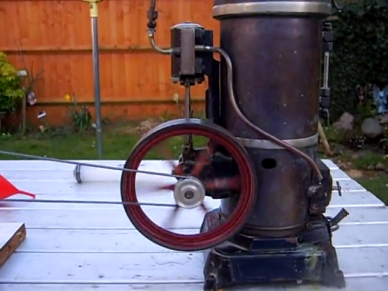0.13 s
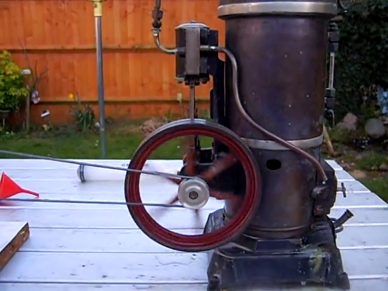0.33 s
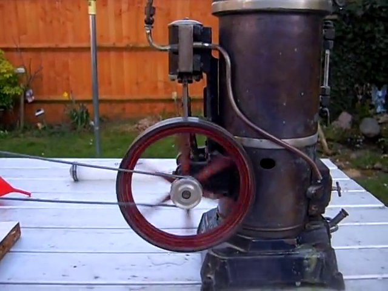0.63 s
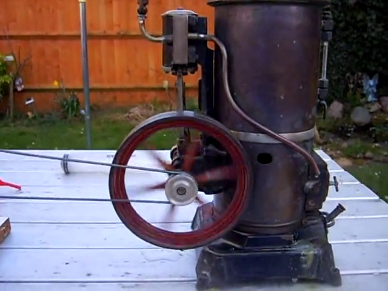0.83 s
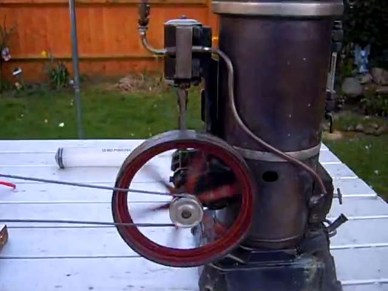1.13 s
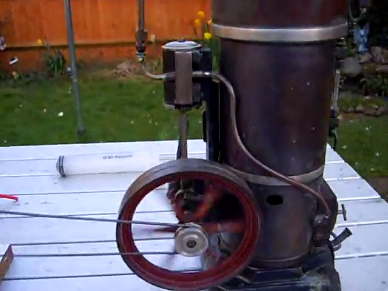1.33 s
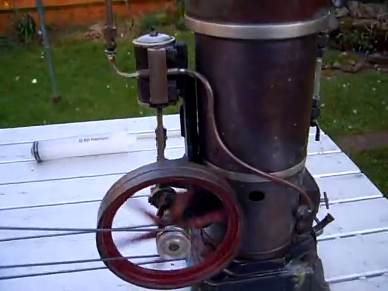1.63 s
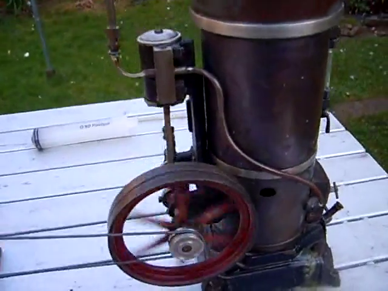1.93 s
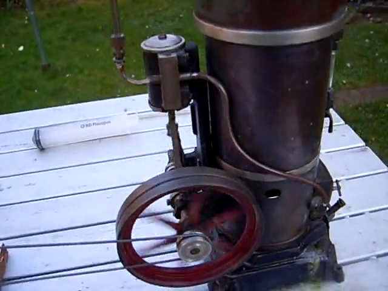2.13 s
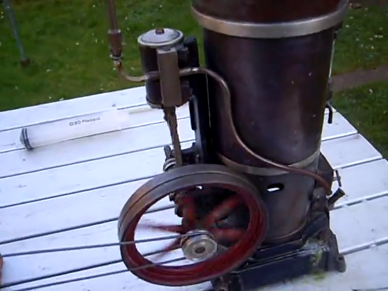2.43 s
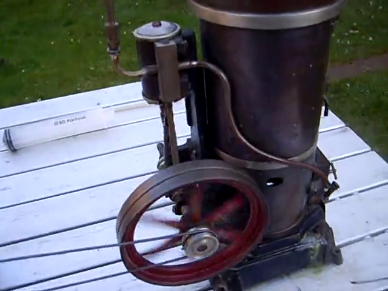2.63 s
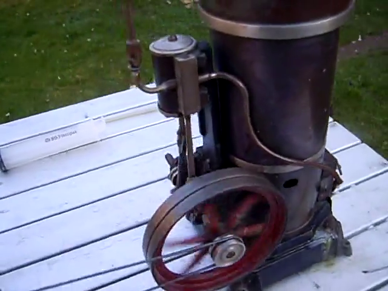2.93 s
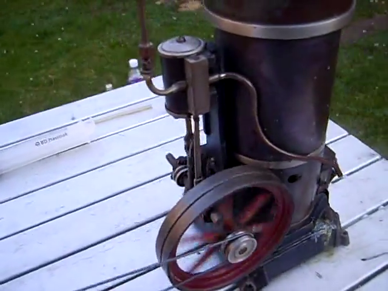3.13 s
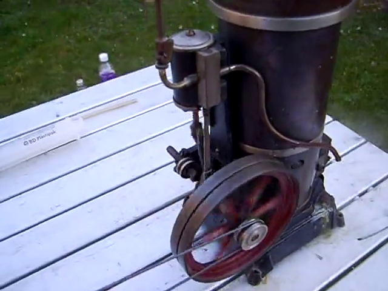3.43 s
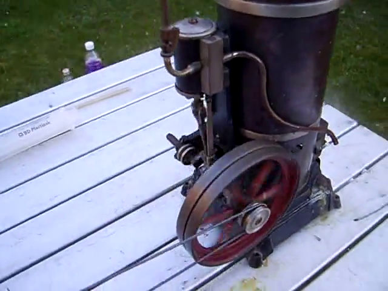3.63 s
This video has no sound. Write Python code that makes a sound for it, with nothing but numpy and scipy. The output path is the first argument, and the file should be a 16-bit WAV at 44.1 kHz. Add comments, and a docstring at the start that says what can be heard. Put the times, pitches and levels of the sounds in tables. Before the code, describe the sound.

A small model steam engine runs steadily outdoors, close to the microphone, hissing about twenty-one puffs a second, with a wet chirp each turn, sharp spits, a low buzz and a double belt knock roughly every 0.6 seconds.

```python
"""Hissing puffs come first, two to each turn of a small model steam engine, heard close by as the listener rises.
The puffs are coloured noise let through by opening and closing ports, with tiny ticks of spray inside them.
Behind them lie a low buzz built from sine waves and the soft noise of the garden air and running gear.
Noise bands make the rubbing slides; short falling tones make a chirp in each turn; drops splash and ring.
The belt joint knocks with fading tones and a noisy rattle, and a thin sine whine comes up late."""
import sys
import numpy as np
from scipy.fft import rfft, irfft, next_fast_len
from scipy.io import wavfile
from scipy.ndimage import uniform_filter1d, map_coordinates

SR = 44100
rng = np.random.default_rng(int(sys.argv[2]) if len(sys.argv) > 2 else 0)


def wrap_up_sound(samples):
    """Save the sound to the file named by the first command line argument, as 16-bit audio."""
    columns = np.atleast_2d(samples).T
    # keep every value between -1 and 1, then stretch to whole-number steps
    tamed = np.clip(columns, -1, 1)
    steps = np.round(tamed * 32767).astype(np.int16)
    wavfile.write(sys.argv[1], SR, steps)


N = 166257  # length in samples


def amp(db):
    """Turn decibels into a multiplier for the sound."""
    return 10 ** (np.asarray(db) / 20)


def unit(x):
    """Scale a sound so that its rms (average strength) is 1."""
    return x / np.sqrt(np.mean(x ** 2) + 1e-20)


def curve(rows, column=1):
    """Draw straight lines between the timed points of one column, giving a value at every sample."""
    columns = np.transpose(rows)
    return np.interp(np.arange(N) / SR, columns[0], columns[column])


def along(points, hz):
    """Read values between (pitch, value) points, spacing the pitches as the ear does (log scale)."""
    point_hz, values = np.transpose(points)
    return np.interp(np.log(hz + 1), np.log(point_hz), values)


def wobble(rate):
    """Join random values, rate of them a second, into a smooth curve."""
    knots = rng.standard_normal(int(N * rate / SR) + 4)
    return map_coordinates(knots, [np.arange(N) * rate / SR])


def filtered(x, response):
    """Make each frequency of a sound stronger or weaker, as response says."""
    size = next_fast_len(N + SR // 2)  # spare room keeps the end from wrapping onto the start
    gains = response(np.fft.rfftfreq(size, 1 / SR))
    return irfft(rfft(x, size) * gains, size)[:N]


def noise(spectrum):
    """Colour random noise by a (pitch_hz, level_db) table, thin out its deepest bass and set rms to 1."""
    def colour(hz):
        """Table level times a gentle bass cut."""
        bass_cut = hz / (hz + spectrum[0][0] / 2)
        return amp(along(spectrum, hz)) * bass_cut
    return unit(filtered(rng.standard_normal(N), colour))


def phase_of(hz):
    """Add up a changing pitch into the running angle of its wave, in radians."""
    return 2 * np.pi * np.cumsum(hz) / SR


def add(track, s, sound):
    """Mix a short sound into a track at s seconds, cutting it off at the track's end."""
    part = track[max(round(s * SR), 0):][:len(sound)]
    part += sound[:len(part)]


def steam(view):
    """Rushing steam is noise whose colour blends with the listener's position, plus one sliding band."""
    # colour of the steam from each position: pitch_hz, level_db
    side = [(400, -13.5), (900, -13), (1400, -10), (1850, -9.5), (2450, -23), (3050, -2), (3650, 3),
            (4200, 0), (4750, -14.5), (5350, -7), (5800, -14), (6450, -4.5), (7150, -8), (7600, -14.5),
            (8200, -21.5)]
    half_above = [(400, -15), (1500, -11), (2050, -5), (2400, -3.5), (3100, 5), (3650, -4), (4550, -5.5),
                  (5200, -1.5), (5850, -10), (6600, -1), (7200, 1), (7600, 3.5), (8200, -26)]
    above = [(400, -8.5), (1500, -13), (2080, -7.5), (2400, -10), (2950, -1), (3620, -12), (4150, -3.5),
             (4650, -7.5), (5300, -5), (5850, -10), (6450, 2.5), (7450, 4), (8200, -21)]
    # band of hiss that slides down as the listener rises: start_s, pitch_hz, level_db
    glide = [(0, 6570, -11.5), (.8, 6550, -7.5), (1.15, 6320, -5), (1.45, 5850, -10.5), (1.75, 5300, -7),
             (2.3, 5063, -12), (3.77, 5050, -13.5)]
    glide_width_hz = 740

    hiss = np.zeros(N)
    for position, colour in enumerate((side, half_above, above)):
        share = np.clip(1 - abs(view - position), 0, 1)
        hiss += np.sqrt(share) * noise(colour)

    def slow_noise():
        """Noise near zero pitch, ready to be moved up to the band."""
        return unit(filtered(rng.standard_normal(N), lambda hz: np.exp(-2 * (hz / glide_width_hz) ** 2)))

    phase = phase_of(curve(glide))
    band = slow_noise() * np.cos(phase) + slow_noise() * np.sin(phase)
    return hiss + amp(curve(glide, column=2)) * band


def valve(turns, opens, closes, rise, fall, sag_db):
    """A port opens and closes once a turn, and its flow sags steadily while open."""
    since_opening = (turns - opens + rise / 2) % 1  # in turns
    opening = np.clip(since_opening / rise, 0, 1)
    closing = np.clip((closes - opens - since_opening) / fall, 0, 1)
    return opening * closing * amp(-sag_db * since_opening)


def spray():
    """Tiny drops tick at random moments, each a brief fading tone."""
    drops_per_s, loudest_db, t60_s = 8.8, -35.5, .005  # t60_s: time to fade by 60 dB
    out, t = np.zeros(N), np.arange(SR // 100) / SR
    for when, size, pitch in rng.random((int(drops_per_s * N / SR), 3)):
        fade = amp(loudest_db - 5 * size - 60 * t / t60_s)
        tone = np.sin(2 * np.pi * (3000 + 4000 * pitch) * t)
        add(out, when * N / SR, fade * tone)
    return out


def exhaust(turns):
    """Two ports let out a strong and a duller weak puff each turn, with a little leakage between."""
    # ports: opens_turn (middle of the rise), closes_turn (shut half a rise before this),
    # rise_turns, fall_turns, sag_db per turn
    strong_puff = (0.0016, 0.44, 0.029, 0.071, 3)
    weak_puff = (0.5, 0.87, 0.02, 0.03, 10.4)
    # level of each puff: start_s, level_db
    strong_db = [(0, -43.5), (.7, -45), (1.2, -44), (1.6, -45), (2.2, -44.5), (2.9, -43), (3.3, -42.5),
                 (3.77, -44)]
    weak_db = [(0, -44), (.7, -44), (1.2, -44), (1.6, -47.5), (2.2, -45), (2.9, -43.5), (3.77, -45)]
    # duller colour of the weak puff: pitch_hz, level_db
    weak_tilt = [(600, 3.5), (3000, 0.5), (5000, -2), (7500, -4)]
    # where the listener is: start_s, position (0 side, 1 half above, 2 above)
    view_points = [(0, 0.11), (1.2, 0), (1.85, 1.32), (2.3, 1.63), (2.9, 2), (3.77, 1.88)]
    leak_db = -19.5  # next to the strong puff
    flutter_db, scatter_db = 1.58, 0.68  # scale of fast roughness and of slower wandering

    view = curve(view_points)
    strong_gate = valve(turns, *strong_puff)
    weak_gate = valve(turns, *weak_puff)
    strong = amp(curve(strong_db)) * np.hypot(strong_gate, amp(leak_db)) * steam(view)
    dull_steam = filtered(steam(view), lambda hz: amp(along(weak_tilt, hz)))
    weak = amp(curve(weak_db)) * weak_gate * dull_steam
    roughness = amp(flutter_db * wobble(450) + scatter_db * wobble(20))
    return (strong + weak) * roughness + spray() * (strong_gate + weak_gate)


def drone():
    """A low motor-like buzz adds sine waves at multiples of its pitch; its pattern repeats every four beats."""
    # main pitch before a slight wobble: start_s, pitch_hz
    pitch_points = [(0, 65.2), (1, 65), (2, 64.7), (3, 64.4), (3.77, 64.3)]
    # level of the upper and in-between waves together: start_s, level_db
    upper_db = [(0, -13), (.7, -10.5), (1.3, -5), (2, -3), (3, -1.5), (3.77, -2.5)]
    # sine waves (partials): multiple of the main pitch, level_db
    low = [(1, -68.5), (2, -72)]
    high = [(3, -61), (4, -56.5), (5, -70)]
    between = [(2.75, -71), (3.25, -64.5), (3.5, -63), (3.75, -68), (4.25, -70.5), (4.5, -63), (4.75, -60),
               (5.25, -64), (5.75, -69)]
    disorder_rad = .3  # random shift between partials

    phase = phase_of(curve(pitch_points) * (1 + 0.0011 * wobble(6.3)))

    def partials(rows, spread):
        """Add the waves, nearly in step or spread out over the pattern."""
        total = np.zeros(N)
        for multiple, db in rows:
            quarters = round(4 * multiple)  # counted in quarters of the main pitch
            shift = spread * np.pi * quarters * quarters / 13 + disorder_rad * rng.standard_normal()
            total += np.sqrt(2) * amp(db) * np.cos(quarters * phase / 4 + shift)
        return total

    upper = partials(high, False) + partials(between, True)
    return partials(low, False) + amp(curve(upper_db)) * upper


def air():
    """Garden air and running gear make a steady coloured noise whose level drifts."""
    # colour: pitch_hz, level_db
    colour = [(25, -7), (60, 2.5), (110, -1), (250, 2), (420, 2), (600, 2), (1000, 2), (1600, -7),
              (3000, -8), (8000, -23.5)]
    # overall level: start_s, level_db
    level = [(0, -56), (1.5, -57.5), (2.3, -54.5), (3.77, -57)]
    return amp(curve(level)) * noise(colour)


def slides(turns):
    """Rods and slides rub at the same places in every turn, each giving a swell of band noise."""
    # rubbing places: centre_turn, width_turns, pitch_hz, bandwidth_hz, level_db at the centre
    rubs = [(.27, 0.035, 2050, 670, -50), (0.356, 0.023, 2880, 583, -51.5), (.52, 0.029, 1026, 468, -53),
            (0.619, 0.055, 1170, 487, -59.5), (0.811, 0.016, 1944, 900, -62.5)]
    out = np.zeros(N)
    for centre, width, hz, band_hz, db in rubs:
        rub = unit(filtered(rng.standard_normal(N), lambda f: 1 / (1 + (2 * (f - hz) / band_hz) ** 2)))
        from_centre = (turns - centre + .5) % 1 - .5  # in turns
        out += amp(db) * rub * np.exp(-(from_centre / width) ** 2)
    return out


def chirps(turns):
    """A short wet tone falls in pitch as the strong puff shuts off, a little different each turn."""
    # level before scatter and colouring: start_s, level_db
    level = [(0, -40), (.7, -46.5), (1.25, -40), (1.6, -42), (2.5, -42), (3.77, -42.5)]
    # starting pitch: start_s, multiple of base_hz
    start_pitch = [(0, 1.38), (1.1, 1.2), (1.7, 0.978), (3.77, 0.87)]
    # colour: pitch_hz, level_db
    body = [(500, -9), (950, 3.5), (1180, -6), (1600, -1), (2000, -0.5), (2800, -4.5)]
    at_turn, base_hz, end_hz = .415, 2760, 684
    glide_s, length_s = 0.00198, 0.0073
    rough_rad, scatter_db = .55, 1.2

    out, t = np.zeros(N), np.arange(SR // 50) / SR
    times = np.interp(np.arange(int(turns[-1])) + at_turn, turns, np.arange(N) / SR)
    start_hz = base_hz * curve(start_pitch)
    shape = np.sin(np.pi * np.clip(t / length_s, 0, 1) ** 0.57)  # quick rise, slower fall
    for s, (size, tune, late) in zip(times, rng.standard_normal((len(times), 3))):
        pitch = end_hz + (start_hz[int(s * SR)] - end_hz) * np.exp(-t / glide_s)
        rough = rough_rad * unit(uniform_filter1d(rng.standard_normal(len(t)), size=24))
        tone = np.sin(phase_of(pitch * (1 + 0.057 * tune)) + rough)
        add(out, s + 0.00035 * late, amp(scatter_db * size) * shape * tone)
    return filtered(out * amp(curve(level)), lambda hz: amp(along(body, hz)))


def spits():
    """Each drop of water bursts with a noisy splash and rings the exhaust pipe briefly at two pitches."""
    # drops: start_s, level_db (shared by ring and splash), pitch_hz, t60_s (time to fade by 60 dB)
    drops = [(0.049, -24, 3700, 0.0056), (0.0987, -25.5, 3730, 0.013), (0.1447, -25, 3800, 0.011),
             (0.196, -25.5, 3760, 0.0094), (0.4864, -24, 2900, 0.015), (.7634, -20, 3400, 0.006),
             (0.959, -25.5, 3260, 0.005), (1.0803, -25.5, 3020, 0.016), (1.67, -22, 3180, 0.011),
             (2.238, -25.5, 2740, 0.015), (2.820, -23.5, 2740, 0.013), (3.111, -28, 7100, 0.0077),
             (3.383, -21, 2750, 0.014)]
    # colour of the splash: pitch_hz, level_db
    splash_colour = [(200, -15.5), (700, 7.5), (1600, 2), (3000, 3.5), (4500, 3), (6200, 6), (8200, -14)]
    ring_db, upper_db, splash_db = -3.5, -8, -5  # each next to the drop's level
    upper_hz, attack_s = 4900, 0.00039

    out, splash, t = np.zeros(N), np.zeros(N), np.arange(SR // 20) / SR
    for s, db, hz, t60 in drops:
        shape = amp(db - 60 * t / t60) * (1 - np.exp(-t / attack_s))
        add(out, s, amp(ring_db) * shape * np.sin(2 * np.pi * hz * t))
        add(out, s, amp(upper_db) * shape * np.sin(2 * np.pi * upper_hz * t))
        add(splash, s, amp(splash_db) * shape)
    return out + splash * noise(splash_colour)


def belt():
    """The belt joint strikes the pulley twice in quick succession, ringing several pitches and rattling."""
    # knocks: start_s, level_db, ping_db (bright ping)
    knocks = [(.2845, -34.5, -50), (.8712, -34.5, -45), (1.463, -37, -40), (2.0447, -34, -33.5),
              (2.6165, -33, -41), (3.189, -31.5, -34.5), (3.761, -34, -41)]
    # both ends of the joint: delay_s, level_db next to the knock
    contacts = [(0, -3), (.0108, -4.5)]
    # ringing tones before random changes: pitch_hz, level_db, t60_s
    modes = [(597, 0, 0.038), (944, -7.5, 0.021), (1419, -3.5, 0.034), (2010, -1.5, 0.031), (2930, -4, .02)]
    # colour of the rattle: pitch_hz, level_db
    rattle_colour = [(300, -39), (520, 8.5), (1500, 6), (2200, 5.5), (3500, -2), (8000, -26)]
    rattle_db, rattle_t60_s = -8.5, 0.047
    ping_hz, ping_t60_s, attack_s = 5770, 0.025, 0.00082

    out, t = np.zeros(N), np.arange(SR // 10) / SR
    rattle_power = np.zeros(N)
    for s, db, ping_db in knocks:
        for delay, contact_db in contacts:
            ring = np.zeros(len(t))
            for hz, level, t60 in modes:
                fade = amp(level + rng.normal(0, 2.2) - 60 * t / t60)
                ring += fade * np.sin(2 * np.pi * hz * rng.normal(1, 0.014) * t)
            ping = amp(ping_db - 60 * t / ping_t60_s) * np.sin(2 * np.pi * ping_hz * t)
            attack = 1 - np.exp(-t / attack_s)
            add(out, s + delay, amp(contact_db) * (amp(db) * ring + ping) * attack)
            rattle_fade = amp(db + contact_db + rattle_db - 60 * t / rattle_t60_s)
            add(rattle_power, s + delay, rattle_fade ** 2)
    return out + np.sqrt(rattle_power) * noise(rattle_colour)


def whine():
    """A thin sine tone with a slightly unsteady pitch, very faint at first and rising late."""
    # pitch before the wobble, and level: start_s, pitch_hz, level_db
    points = [(0, 471, -84), (2.2, 470.6, -76.5), (3.1, 469, -71.5), (3.45, 461, -64.5), (3.77, 461, -62)]
    phase = phase_of(curve(points) * (1 + 0.0046 * wobble(20)))
    return np.sqrt(2) * amp(curve(points, column=2)) * np.sin(phase)


def scene():
    """The crank times puffs, rubs and chirps; the other sounds keep their own times."""
    # crank speed: start_s, turns per second
    speed = [(0, 10.55), (.45, 10.47), (1, 10.57), (1.5, 10.64), (2, 10.69), (2.6, 10.72), (3.1, 10.75),
             (3.77, 10.72)]
    turns = np.cumsum(curve(speed)) / SR
    engine = exhaust(turns) + slides(turns) + chirps(turns) + spits() + belt()
    return (engine + drone() + air() + whine())[None]


def record(dry):
    """The microphone cuts the treble very steeply around its upper limit."""
    top_hz = 8300
    return filtered(dry[0], lambda hz: 1 / np.sqrt(1 + (hz / top_hz) ** 110))[None]


dry = scene()
out = record(dry)
wrap_up_sound(out)
```